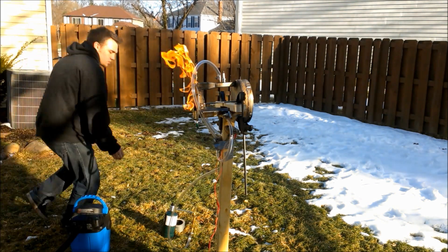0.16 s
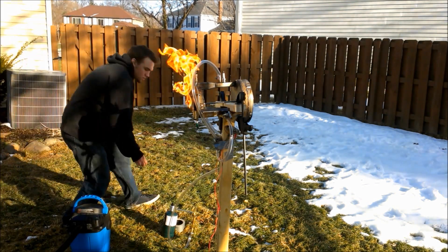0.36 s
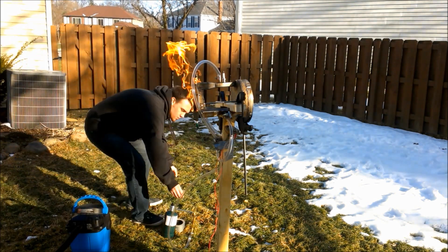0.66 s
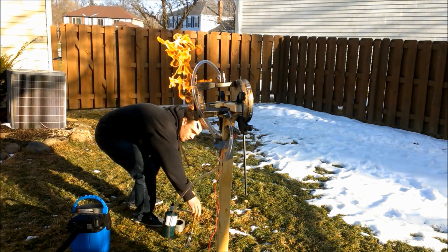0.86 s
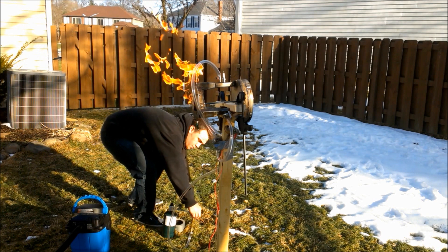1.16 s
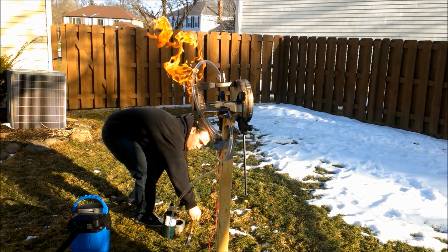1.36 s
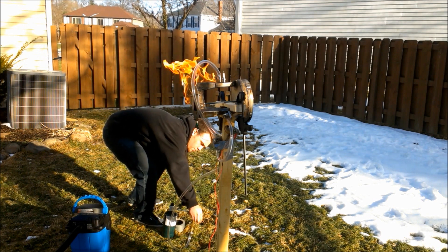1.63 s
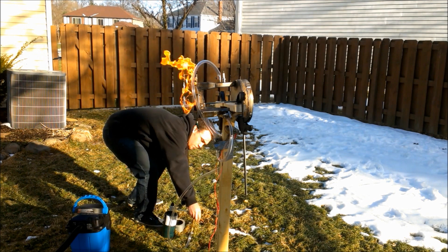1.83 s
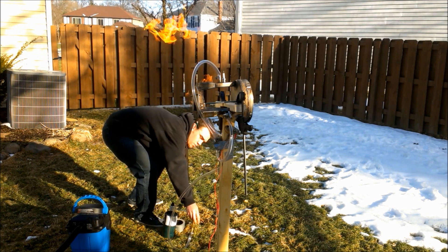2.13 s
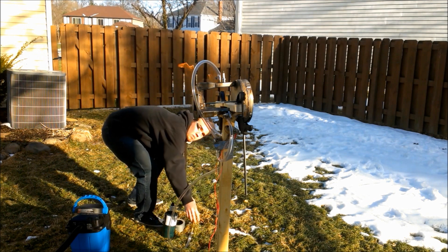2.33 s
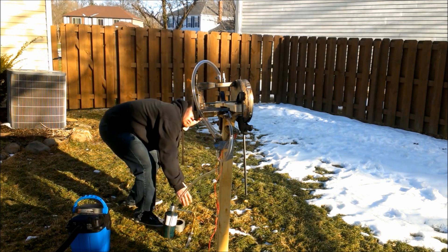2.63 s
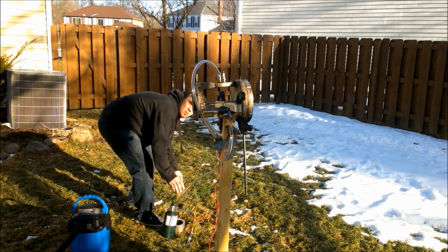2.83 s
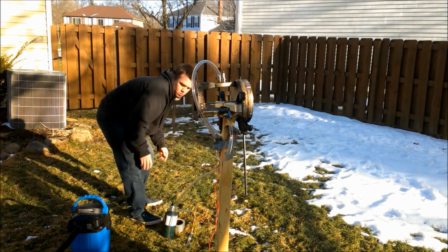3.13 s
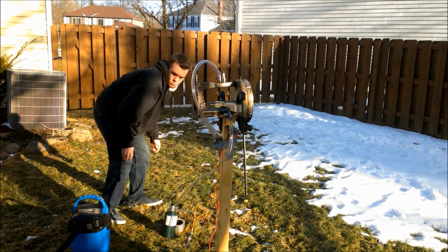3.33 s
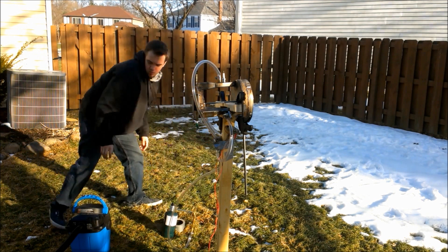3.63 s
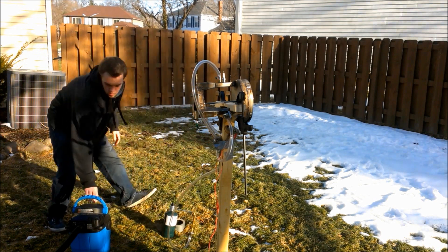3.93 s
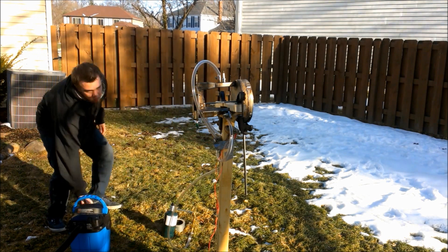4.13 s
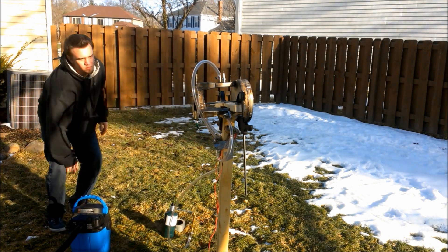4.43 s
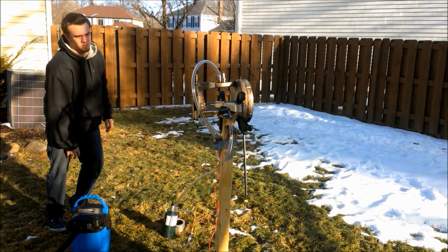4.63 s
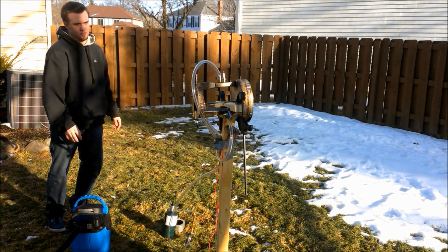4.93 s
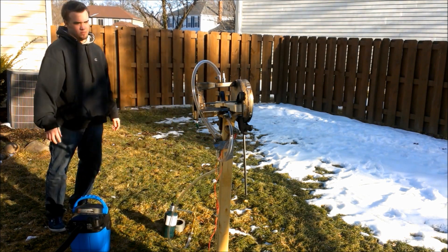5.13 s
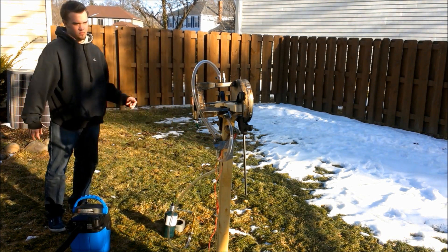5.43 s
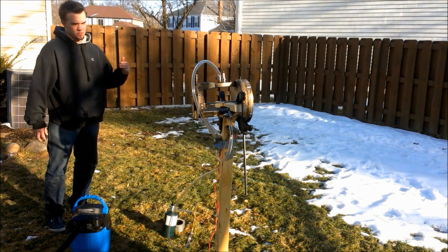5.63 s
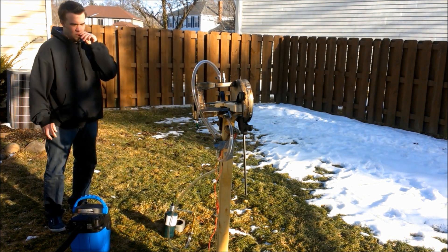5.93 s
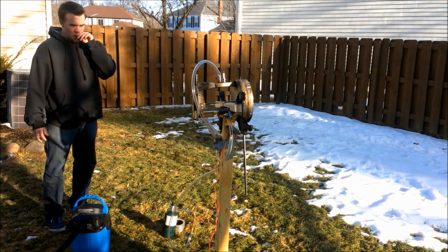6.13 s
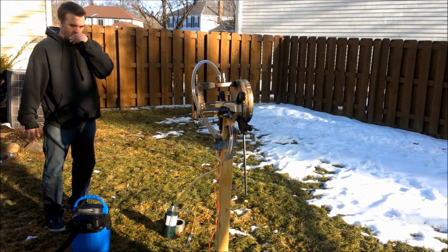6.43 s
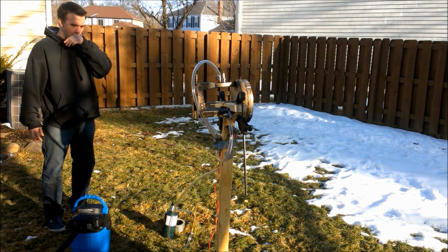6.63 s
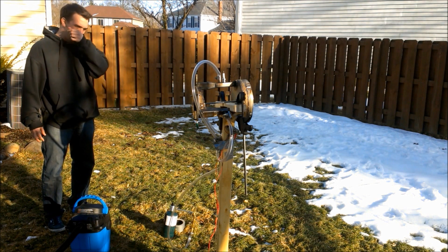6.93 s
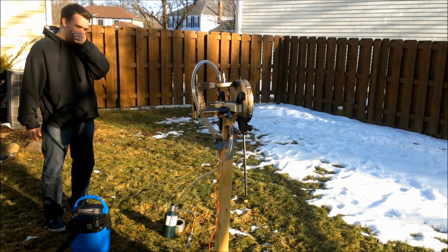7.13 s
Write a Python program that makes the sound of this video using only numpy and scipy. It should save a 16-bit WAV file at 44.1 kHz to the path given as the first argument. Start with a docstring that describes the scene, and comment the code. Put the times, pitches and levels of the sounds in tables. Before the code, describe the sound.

An electric blower runs slightly left of centre in a quiet yard, with a steady whine, a hum and a hiss of air. Two dull thuds land on the turf while light wind rumbles on the microphone. About halfway through, a switch clicks and the motor winds down, its whine falling in pitch as the hiss fades. A few faint footfalls follow near the end.

```python
"""Electric blower, then coast-down

A blower runs left of centre in a yard: the rotor hums and whines, brushes buzz, air hisses through
the housing and whistles over an edge. A person thuds on the turf and clicks the switch at 4 s.
Drag slows the rotor, and its tones sweep down through the canister and frame resonances.
Gusts rumble low over a quiet neighbourhood wash."""
import sys
import numpy as np
from scipy import signal
from scipy.fft import rfft, irfft, next_fast_len
from scipy.io import wavfile
from scipy.ndimage import uniform_filter1d

SR = 44100
rng = np.random.default_rng(int(sys.argv[2]) if len(sys.argv) > 2 else 0)


def int16_out(signal):
    """Quantize to a 16-bit WAV file."""
    q = np.round(np.clip(np.atleast_2d(signal).T, -1, 1) * 32767)
    wavfile.write(sys.argv[1], SR, q.astype(np.int16))


N = 320607

RUN_HZ, OFF_S, MAINS_HZ = 532.3, 4.0042, 120  # shaft speed, switch-off, mains ripple
FAN_DRAG, OIL_DRAG, BRUSH_DRAG = .0011157, .06086, 38.508  # slowing [Hz/s] = fan hz^2 + oil hz + brush
TOP_ORDER, FAINT_DB = 60, -50
DULLED_S, EDGE_HZ = 2.85, 15750  # hiss changes colour, band limit
STEP = 256  # samples per control point

# powered hum: (time [s], order 1 [dB], order 2 [dB], order 3 [dB])
HUM = [(0, -46, -61, -59), (.15, -44, -64, -58.5), (.55, -55, -53.5, -60.5), (.75, -52.5, -57, -51),
       (1.1, -49.5, -58, -59.5), (1.6, -50, -53.5, -61.5), (1.9, -50, -58.5, -59.5),
       (2.35, -52, -57.5, -61), (2.78, -47.5, -58.5, -67), (2.9, -51, -65, -67), (3.2, -47.5, -62, -61),
       (3.6, -53, -73, -61.5), (4.0, -53.5, -62, -59)]
# powered whine of the 12 armature slots: (time [s], order 12 [dB], order 24 [dB])
SLOT_WHINE = [(0, -53, -71), (.17, -44.5, -61), (.25, -52, -69), (.36, -46.5, -67), (.62, -46, -61),
              (.85, -40.5, -59), (1.02, -49, -67), (1.2, -47, -70), (1.38, -59, -68), (1.6, -47, -66),
              (1.78, -40, -64), (1.96, -49.5, -67), (2.4, -52.5, -67), (2.53, -43, -67), (2.6, -51, -68),
              (2.74, -43, -66), (2.93, -57.5, -69), (3.12, -48.5, -81), (3.35, -65, -78), (3.5, -49.5, -79),
              (3.65, -55, -79), (3.83, -53.5, -81), (4.0, -69, -86)]
# canister response to the coasting hum: (shaft speed [Hz], level [dB])
CANISTER = [(90, -90), (156, -81.5), (165, -62), (175, -52.5), (200, -47), (230, -43), (255, -33),
            (275, -36.5), (310, -42.5), (345, -44.5), (375, -56), (440, -41), (475, -47.5), (532, -59)]
# canister nulls: (centre [Hz], width [Hz], gain [dB])
CANISTER_NULLS = [(181.8, 12.4, -10.5), (215.2, 9.8, -21.5), (259.3, 13, -6), (396, 13, -10.5),
                  (425.5, 8.1, -12)]
# coasting hum overtones: (time [s], order 2 [dB], order 3 [dB])
COAST_OVERTONES = [(4.0, -47, -71), (4.12, -54, -51), (4.22, -56, -82), (4.34, -73, -69), (4.5, -84, -91),
                   (4.63, -66, -68.5), (4.83, -76, -68.5), (5.02, -63.5, -71), (5.25, -78, -75),
                   (5.35, -72, -74), (5.5, -71, -76), (5.62, -83, -84), (5.76, -61.5, -70),
                   (5.95, -71, -95), (6.2, -79, -94), (6.45, -90, -94), (7.0, -94, -90)]
# coasting slot whine: (time [s], order 12 [dB], order 24 [dB])
COAST_SLOTS = [(4.0, -55, -80), (4.12, -55, -88), (4.19, -44, -87), (4.26, -55, -88), (4.42, -60, -83),
               (4.5, -70, -90), (4.64, -63, -77), (4.8, -72, -84), (4.95, -86, -82), (5.05, -86, -70),
               (5.25, -82, -69), (5.32, -78, -72), (5.38, -76, -58), (5.48, -82, -61), (5.53, -84, -80),
               (5.6, -94, -85), (5.75, -92, -88), (5.86, -79, -81), (5.93, -83, -80), (6.05, -97, -83),
               (6.2, -99, -92), (7.0, -104, -96)]
# brush and bearing tones: (shaft order, powered re hiss [dB], coasting re grind [dB])
BRUSH_ORDERS = [(4, -30, 2), (4.375, -38, 15), (5, -50, 1), (6, -35, -3), (7, -25, 15), (9, -31, 12),
                (10, -20, -2), (11, -24, -1), (13, -20, -1), (14, -35, 1), (15, -37, 8), (16, -30, 4),
                (17, -32, 9), (18, -39, 3), (19, -50, 8), (22, -50, 4), (25, -50, 6), (27, -50, 10),
                (29, -50, 5), (31, -50, 6), (34, -50, 7), (36, -50, 9), (37, -50, 7), (39, -50, 6),
                (41, -50, 12), (43, -50, 5), (44, -50, 6)]
# coasting brush grind: (time [s], level [dB])
GRIND = [(4.1, -78), (4.45, -78), (5.0, -82), (5.45, -82), (5.6, -95), (5.75, -90), (5.88, -88), (6.0, -93),
         (6.55, -95), (6.8, -100), (7.27, -107)]
# motor frame response: (frequency [Hz], gain [dB])
FRAME = [(300, -4), (900, -10), (1250, -16), (2400, -13), (3600, -11), (4300, -2), (6500, -5), (8500, -14),
         (10500, -22), (15700, -30)]
# frame modes: (centre [Hz], width [Hz], gain [dB])
FRAME_MODES = [(740, 360, 17), (1480, 120, 9), (2050, 200, 6), (2330, 160, 3), (2850, 200, 15),
               (3250, 140, 10), (4150, 400, 2), (4780, 200, 2), (5680, 400, 13), (6250, 100, 4),
               (6950, 400, 4)]
# airflow: (time [s], hiss [dB], treble fizz re hiss [dB], low drone re hiss [dB])
AIR = [(0, -38.5, -6, -20), (.7, -38, -7, -23.5), (1.25, -38.5, -7, -23), (1.8, -39.5, -6.5, -21.5),
       (2.1, -40, -7.5, -22), (2.8, -39.5, -7, -21.5), (2.88, -42, -12.5, -21.5), (3.5, -43, -11.5, -20),
       (3.97, -43, -13, -19.5), (4.03, -43, -8.5, -19), (4.12, -46, -13, -22), (4.22, -48, -12, -18),
       (4.45, -51.5, -13.5, -23), (4.53, -55, -13, -20.5), (5.05, -59, -11, -14.5), (5.3, -63.5, -12, -13),
       (5.48, -62, -11, -15), (5.55, -63, -9, -13), (5.61, -71, -26, -21), (5.72, -65.5, -10, -11.5),
       (5.88, -69, -7, -10.5), (5.96, -72.5, -14, -10.5), (6.2, -77, -11, -6.5), (6.45, -79.5, -12, -1.5),
       (6.7, -80, -10, -4), (7.0, -76, -11, -9.5), (7.27, -87, -16, -14)]
# housing and hose response: (frequency [Hz], gain [dB])
HOUSING = [(180, -47), (300, -13.5), (600, -9), (1070, -12), (1300, -14), (1570, -16.5), (2050, -21),
           (2500, -20.5), (3400, -15), (4000, -8.5), (6500, -8.5), (9300, -17), (12000, -22.5),
           (15700, -23)]
# housing cavities: (centre [Hz], width [Hz], gain [dB])
CAVITIES = [(4230, 670, 1), (2950, 47, 4.5), (4630, 150, 4), (5597, 500, 6.5), (6980, 510, 0.5),
            (6900, 130, 6), (8480, 480, 5), (997, 125, 8), (1422, 95, 12)]
# hiss colour added after DULLED_S: (centre [Hz], width [Hz], gain [dB])
DULLED = [(1440, 450, -3), (684, 145, 4.5), (350, 100, 4.5), (3650, 300, 2.5)]
# hiss colour added as the flow drops: (centre [Hz], width [Hz], gain [dB])
COAST_COLOUR = [(1880, 770, 5), (2940, 950, 7.5), (12200, 4200, 0.5)]
# edge whistle: (time [s], level [dB])
WHISTLE = [(0, -90), (.35, -51), (.5, -76), (.62, -57), (1.15, -60), (1.55, -57), (2.1, -53), (2.25, -51.5),
           (2.45, -60), (2.87, -51), (3.05, -58), (3.12, -49), (3.22, -47), (3.28, -55), (3.36, -58),
           (3.45, -56), (3.7, -68), (4.05, -55.5), (4.4, -68), (4.8, -85), (5.5, -105)]
# switch and snaps: (time [s], level [dB], t60 [s], pitch [Hz], tick share [0-1])
CLICKS = [(3.822, -37, 0.04, 5000, 0.3), (4.001, -22, 0.045, 3300, 0.3), (5.816, -48, 0.15, 3350, 0.1)]
# turf thuds: (time [s], level [dB], pitch [Hz], t60 [s], crunch share [0-1], left minus right [dB])
THUDS = [(1.849, -43, 520, .08, 1, 0), (1.858, -39.5, 320, .12, .4, 0), (1.878, -36, 250, .07, .3, 0),
         (2.832, -41, 700, .04, 1, 0), (2.8385, -26.5, 340, .045, .2, 0), (5.08, -60, 740, 0.12, 1, 0),
         (5.69, -63, 420, .12, .8, 0), (5.82, -50, 260, 0.12, 0.4, 0), (6.575, -63, 220, .06, .1, 0),
         (6.605, -65, 560, .15, .9, -1), (6.838, -63, 240, .06, .1, 0), (7.059, -64, 950, .05, .3, 2),
         (7.071, -47, 175, 0.055, 0.13, 5), (7.085, -61, 150, .25, .3, 3)]
# gust envelope: (time [s], level [dB], deep-bass emphasis [dB])
RUMBLE = [(0, -56, -4), (.7, -56.5, -16), (1.2, -52, -3), (1.35, -55.5, -26), (1.5, -51.5, -12),
          (1.6, -56.5, -5), (1.85, -48.5, -20), (1.98, -56, -5), (2.04, -50, 3), (2.18, -57, -12),
          (2.24, -48.5, 12), (2.31, -48.5, -9), (2.38, -50.5, 9), (2.48, -46.5, -6), (2.52, -54.5, -2),
          (2.63, -52.5, -12), (2.9, -54.5, -5), (3.02, -48, -9), (3.15, -54, -7), (3.36, -52.5, 4),
          (3.7, -52.5, 8), (4.0, -49, 0), (4.3, -56.5, 8), (4.45, -62.5, 2), (5.15, -54.5, -9),
          (5.6, -66, -1), (5.8, -63, 1), (6.1, -84, 27), (6.55, -81.5, 8), (6.72, -66, -17),
          (6.9, -76.5, -18), (7.27, -77, 7)]
# gust spectrum: (frequency [Hz], density [dB])
GUST = [(18, -57), (50, -50), (86, -34), (125, -8.5), (155, 2.5), (185, -4.5), (230, -1.5), (330, -8.5),
        (480, -17), (700, -61), (1060, -93)]
# neighbourhood spectrum: (frequency [Hz], density [dB])
YARD = [(18, -74), (30, -17), (208, -10), (257, -28), (352, -7.5), (521, -8.5), (752, -8), (1090, -13.5),
        (1270, -18.5), (2790, -22), (3180, -22), (4020, -22), (15700, -26)]
# blower balance: (frequency [Hz], left minus right [dB])
BALANCE_DB = [(60, 5), (200, -0.5), (700, -0.5), (1290, 0.5), (1600, -3.5), (2130, -1), (2600, 0.5),
              (3500, 3.5), (4400, 3.5), (5600, 10), (6400, 12.5), (8120, 7.5), (10000, 6), (15000, 7)]
# blower phase: (frequency [Hz], left lead [rad])
LEAD = [(60, 0), (250, .3), (530, .5), (800, .9), (1210, 1.5), (1890, 3.4), (2500, 6.1), (3960, 6.5),
        (4480, 6.7), (5340, 6), (6370, 5.6), (6800, 6.3), (9910, 6.8), (16200, 6.4)]
# hiss and gusts, left to right: (frequency [Hz], coherence [0-1])
AIR_COHERENCE = [(60, 1), (300, 0.94), (700, 0.78), (1400, 0.6), (2400, 0.1), (4400, 0.44), (8000, 0.56),
                 (15000, 0.41)]
# neighbourhood, left to right: (frequency [Hz], coherence [0-1])
YARD_COHERENCE = [(60, 0.63), (130, 0.61), (290, 0.9), (640, 0.86), (1410, 0.5), (3100, 0.087), (6820, 0.1),
                  (15000, 0.12)]


def amp(db):
    return 10 ** (np.asarray(db) / 20)


def evened(x):
    return x / np.sqrt(np.mean(x ** 2) + 1e-20)


def read(points, hz):
    f, value = np.transpose(points)
    return np.interp(np.log(hz + 1), np.log(f + 1), value)


def columns(rows, t):
    s, *cols = np.transpose(rows)
    return [np.interp(t, s, c) for c in cols]


def wander(t, rate, count):
    """Slow chance curves of rms 1, one row each."""
    hz = np.geomspace(rate / 20, rate, num=16)[:, None]
    turns = rng.random((count, 16, 1))
    return evened((np.sin(2 * np.pi * (hz * t + turns)) / np.sqrt(np.sqrt(hz))).sum(1))


def modes_db(modes, hz):
    return sum(db / (1 + (2 * (hz - centre_hz) / width_hz) ** 4) for centre_hz, width_hz, db in modes)


def coast_fade(t, fade_s):
    return np.clip((t - OFF_S) / fade_s, 0, 1)


def port_gains(hz):
    """Complex left and right gains for the blower's position."""
    ratio = amp(read(BALANCE_DB, hz))
    right = np.sqrt(2 / (1 + ratio ** 2))
    return np.array([ratio * right, right * np.exp(-1j * read(LEAD, hz))])


def place_left(mono):
    size = next_fast_len(N)
    return irfft(rfft(mono, size) * port_gains(np.fft.rfftfreq(size, 1 / SR)), size)[:, :N]


def patchy_noise(density_db, coherence, patchy_db, size=1024, gains=1):
    """Stereo noise following density_db(hz, s), with random patches in time and frequency."""
    hop = size // 4
    frame_s, hz = np.arange(N // hop + 5) * hop / SR, np.fft.rfftfreq(size, 1 / SR)[:, None]
    re1, im1, re2, im2, patches = rng.standard_normal((len(frame_s), len(hz), 5)).T
    patches = evened(uniform_filter1d(uniform_filter1d(patches, size=10, axis=0), size=12, axis=1))
    shared = np.clip(read(coherence, hz), -1, 1)
    left = re1 + 1j * im1
    right = shared * left + np.sqrt(1 - shared ** 2) * (re2 + 1j * im2)
    white_density = signal.istft(left, nperseg=size, noverlap=size - hop)[1].std() / np.sqrt(SR / 2)
    spectra = np.array([left, right]) * gains * amp(density_db(hz, frame_s) + patchy_db * patches)
    return signal.istft(spectra, nperseg=size, noverlap=size - hop)[1][:, :N] / white_density


def shaft_angle():
    """Shaft angle [rad]: steady under power, then slowed by fan drag, oil and brush friction."""
    shift_hz = OIL_DRAG / (2 * FAN_DRAG)
    scale_hz = np.sqrt(BRUSH_DRAG / FAN_DRAG - shift_hz ** 2)
    coast_s = np.maximum(np.arange(N) / SR - OFF_S, 0)
    start = np.arctan((RUN_HZ + shift_hz) / scale_hz)
    shaft_hz = scale_hz * np.tan(start - FAN_DRAG * scale_hz * coast_s) - shift_hz
    return 2 * np.pi * np.cumsum(shaft_hz) / SR


def rotor(angle, shaft_hz, t):
    """Hum and armature slot whine; the whine ripples with the mains under power and rasps coasting."""
    grid_s = t[::STEP]
    coasting = coast_fade(grid_s, fade_s=.079)
    powered_db = np.array(columns(HUM, grid_s) + columns(SLOT_WHINE, grid_s))
    canister_db = read(CANISTER, shaft_hz) + modes_db(CANISTER_NULLS, shaft_hz)
    coast_db = np.array([canister_db] + columns(COAST_OVERTONES, grid_s) + columns(COAST_SLOTS, grid_s))
    levels_db = powered_db + coasting * (coast_db - powered_db)
    levels_db[1:] += np.where(grid_s > OFF_S, 2.5, 1.3) * wander(grid_s, rate=18, count=4)
    levels_db[0] += .47 * wander(grid_s, rate=18, count=1)[0]
    ripple = 1 + .25 * np.cos(2 * np.pi * MAINS_HZ * t)
    rasp = np.interp(t, grid_s, amp(3 * wander(grid_s, rate=60, count=1)[0] - 2.5))
    shake = np.where(t < OFF_S, ripple, rasp)
    blur_rad = .9 * np.interp(t, grid_s, wander(grid_s, rate=70, count=1)[0] * np.maximum(coasting, .35))
    coast_speed = np.interp(t, grid_s, shaft_hz / RUN_HZ * coasting)
    rasp_rad = coast_speed ** 2 * np.interp(t, t[::32], wander(t[::32], rate=260, count=1)[0])
    upper_blur_rad = blur_rad * np.where(t < OFF_S, 2, 1)
    partials = [(1, 0, 1), (2, blur_rad, 1), (3, blur_rad, 1),
                (12, blur_rad + rasp_rad, shake), (24, upper_blur_rad + rasp_rad, shake)]
    out = np.zeros(N)
    for (order, phase_rad, tremor), db in zip(partials, levels_db):
        out += np.interp(t, grid_s, amp(db)) * tremor * np.cos(order * angle + phase_rad)
    return place_left(np.sqrt(2) * out)


def brushes(angle, shaft_hz, t):
    """Brush and bearing tones at shaft orders; coasting, each chirps as it crosses a frame mode."""
    grid_s = t[::STEP]
    coasting = coast_fade(grid_s, fade_s=.15)
    hiss_db, fizz_db, _ = columns(AIR, grid_s)
    grind_db = columns(GRIND, grid_s)[0]
    taken = [row[0] for row in BRUSH_ORDERS] + [12, 24]  # slot orders sound in rotor()
    fillers = [(k, FAINT_DB, 3.5 - .07 * k) for k in range(4, TOP_ORDER + 1) if k not in taken]
    orders = BRUSH_ORDERS + fillers
    wavers_db = 2.6 * wander(grid_s, rate=30, count=len(orders)) - 1.5
    starts_rad = 2 * np.pi * rng.random(len(orders))
    bounces_rad = (.3 + 1.4 * coasting) * wander(grid_s, rate=40, count=len(orders))
    out = np.zeros(N)
    for i, (order, powered_db, coast_db) in enumerate(orders):
        hz = order * shaft_hz
        powered = amp(hiss_db + powered_db + (fizz_db + 12.5) * (order > 13))
        coast = amp(grind_db + coast_db + read(FRAME, hz) + modes_db(FRAME_MODES, hz))
        gain = (1 - coasting) * powered + coasting * coast
        gain *= amp(wavers_db[i]) * (hz < EDGE_HZ)
        on = slice(0 if powered_db > FAINT_DB else round(OFF_S * SR), N)  # faint orders: coasting only
        phase_rad = starts_rad[i] + np.interp(t[on], grid_s, bounces_rad[i])
        out[on] += np.interp(t[on], grid_s, gain) * np.cos(order * angle[on] + phase_rad)
    return place_left(np.sqrt(2) * out)


def housing_db(hz):
    """Housing and hose resonances, 0 dB mean across the hiss band."""
    band_hz = np.arange(3000, 6200, 10.)
    band_power = np.mean(amp(read(HOUSING, band_hz) + modes_db(CAVITIES, band_hz)) ** 2)
    return read(HOUSING, hz) + modes_db(CAVITIES, hz) - 10 * np.log10(band_power)


def airflow(angle, t):
    """Turbulent hiss through the housing, pulsed lightly by each impeller turn and by the mains."""
    def density_db(hz, s):
        hiss_db, fizz_db, drone_db = columns(AIR, s)
        treble_db = np.clip(np.log2(hz / 6500 + 1e-9) / .12, 0, 1) * (fizz_db + 7.95)
        bass_db = np.clip(np.log2(2600 / (hz + 1)) / .17, 0, 1) * (drone_db + 18.23)
        flicker_db = .4 * wander(s, rate=25, count=1)[0]
        colour_db = housing_db(hz) + (s > DULLED_S) * modes_db(DULLED, hz)
        colour_db += coast_fade(s, fade_s=.082) * modes_db(COAST_COLOUR, hz)
        return hiss_db - 38.5 + colour_db + treble_db + bass_db + flicker_db
    pulse = 1 + .014 * np.cos(angle) + .014 * np.cos(2 * np.pi * MAINS_HZ * t) * (t < OFF_S)
    gains = port_gains(np.fft.rfftfreq(512, 1 / SR))[:, :, None]
    return pulse * patchy_noise(density_db, AIR_COHERENCE, patchy_db=1.5, size=512, gains=gains)


def whistle(t, centre_hz=3990, width_hz=140, drift_hz=40):
    """Air over an edge rings one cavity: narrow noise of drifting pitch."""
    grid_s = t[::STEP]
    drift, waver = wander(grid_s, rate=12, count=2)
    white = rng.standard_normal(N) + 1j * rng.standard_normal(N)
    baseband = signal.lfilter(*signal.butter(2, width_hz / 2, fs=SR), white)
    hz = centre_hz + drift_hz * np.interp(t, grid_s, drift)
    ring = evened((baseband * np.exp(2j * np.pi * np.cumsum(hz) / SR)).real)
    level_db = columns(WHISTLE, grid_s)[0] + 2 * waver
    return place_left(ring * amp(np.interp(t, grid_s, level_db)))


def clicks():
    """Plastic snaps: a wideband tick plus the ring of the part."""
    out, t = np.zeros(N + SR), np.arange(SR // 8) / SR
    white = rng.standard_normal((len(CLICKS), len(t)))
    ticks = signal.lfilter(*signal.butter(2, 2500, "high", fs=SR), white)
    for (start_s, db, t60_s, hz, tick_share), tick in zip(CLICKS, ticks):
        ring = evened(signal.lfilter(*signal.iirpeak(hz, Q=3.5, fs=SR), tick))
        envelope = (1 - np.exp(-t / .0011)) * amp(db - 11 - 60 * t / t60_s)
        out[round(start_s * SR):][:len(t)] += envelope * (tick_share * tick + .5 * ring)
    return place_left(out[:N])


def thuds(sag=.45):
    """Impacts on turf: a low ground ring of sagging pitch plus a dull crunch."""
    out, t = np.zeros((2, N + SR)), np.arange(SR // 4) / SR
    white = rng.standard_normal((len(THUDS), len(t)))
    crunches = signal.lfilter(*signal.butter(4, (120, 950), "band", fs=SR), white)
    for (start_s, db, hz, t60_s, crunch_share, pan_db), crunch in zip(THUDS, crunches):
        envelope = (1 - np.exp(-t / .0021)) ** 2 * amp(db + 3 - 60 * t / t60_s)
        ring = np.sin(2 * np.pi * hz * t * (1 - sag * np.minimum(t / t60_s, 1)))
        thud = envelope * (ring + crunch_share * evened(crunch))
        out[:, round(start_s * SR):][:, :len(t)] += amp([[pan_db / 2], [-pan_db / 2]]) * thud
    return out[:, :N]


def gusts():
    """Lumpy wind rumble, nearly mono; some gusts reach deeper."""
    def density_db(hz, s):
        level_db, depth_db = columns(RUMBLE, s)
        lumps_db = 2 * evened(uniform_filter1d(rng.standard_normal(len(s)), size=6))
        deep_db = np.clip(np.log2(190 / (hz + 1)) / .083, 0, 1) * .57 * (depth_db + 3)
        return read(GUST, hz) - 21.5 + level_db + deep_db + lumps_db
    return patchy_noise(density_db, AIR_COHERENCE, patchy_db=1.5)


def yard(level_db=-71):
    """Steady, quiet neighbourhood wash."""
    wash = patchy_noise(lambda hz, s: read(YARD, hz), YARD_COHERENCE, patchy_db=.6)
    return amp(level_db) * evened(wash)


def scene():
    angle, t = shaft_angle(), np.arange(N) / SR
    shaft_hz = np.gradient(angle[::STEP], t[::STEP]) / (2 * np.pi)
    blower = rotor(angle, shaft_hz, t) + brushes(angle, shaft_hz, t) + airflow(angle, t) + whistle(t)
    return blower + gusts() + yard() + thuds() + clicks()


def record(dry):
    """Steep low-pass at the band limit."""
    return signal.oaconvolve(dry, signal.firwin(511, EDGE_HZ, window=("kaiser", 9), fs=SR)[None], "same")


dry = scene()
out = record(dry)
int16_out(out)
```